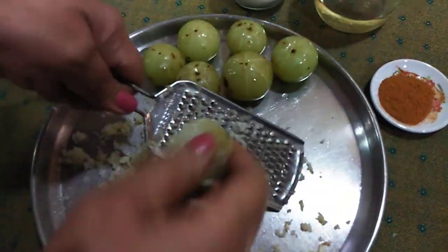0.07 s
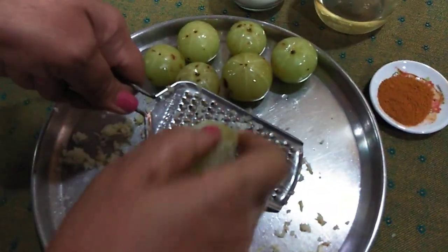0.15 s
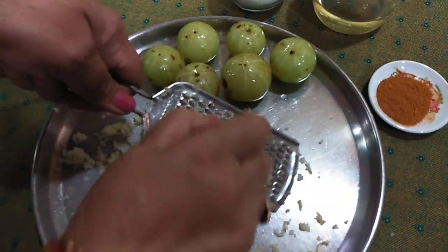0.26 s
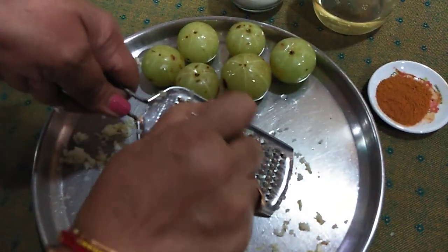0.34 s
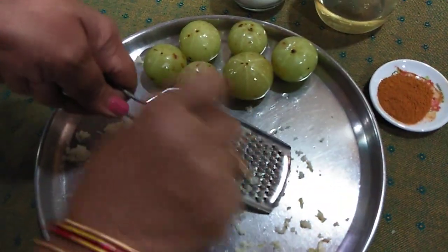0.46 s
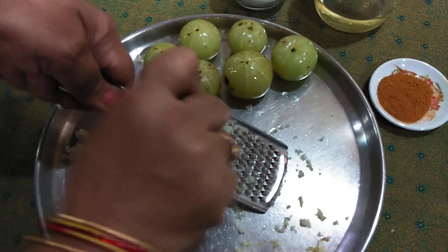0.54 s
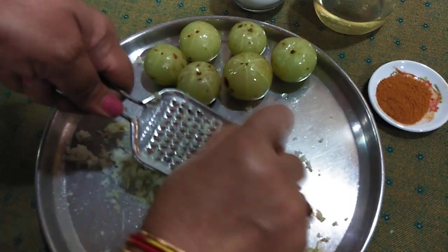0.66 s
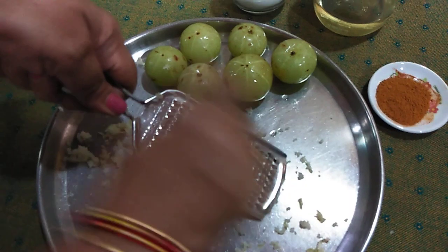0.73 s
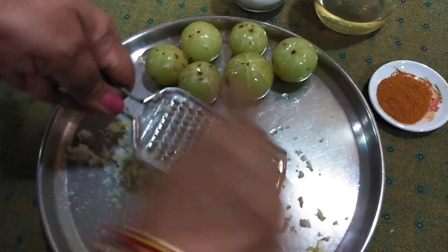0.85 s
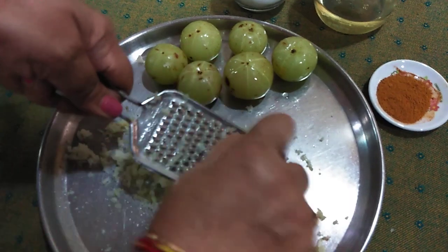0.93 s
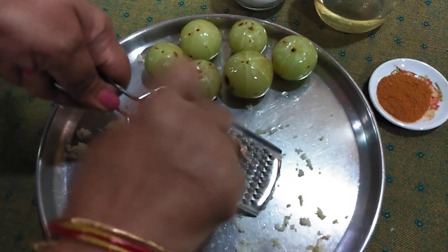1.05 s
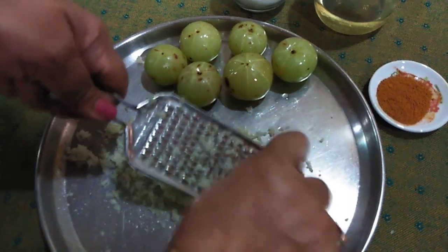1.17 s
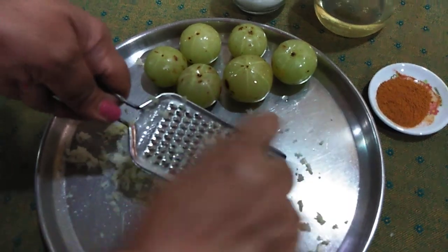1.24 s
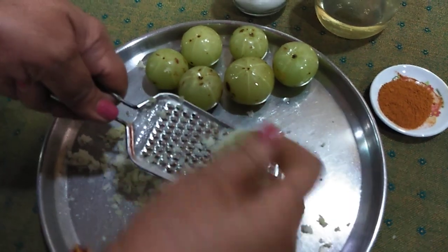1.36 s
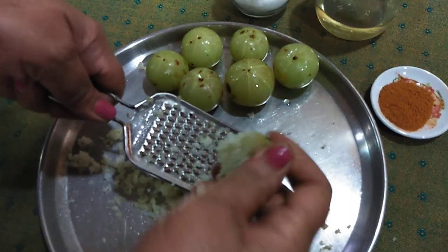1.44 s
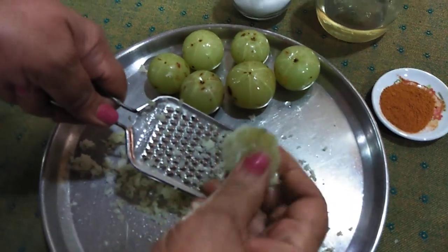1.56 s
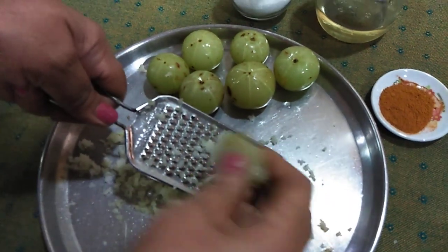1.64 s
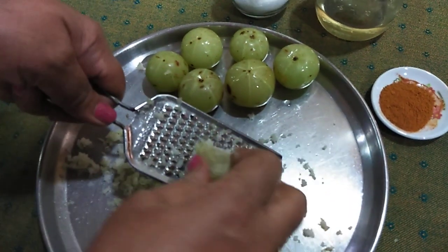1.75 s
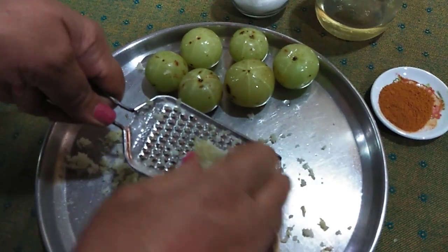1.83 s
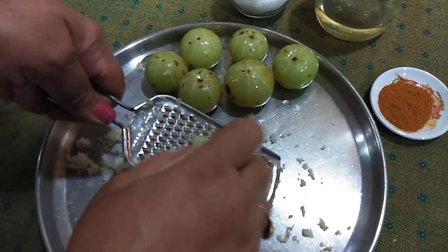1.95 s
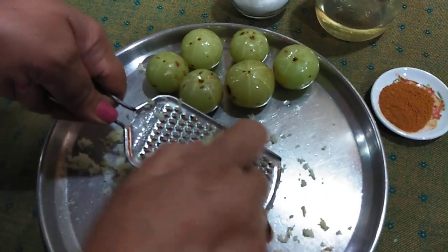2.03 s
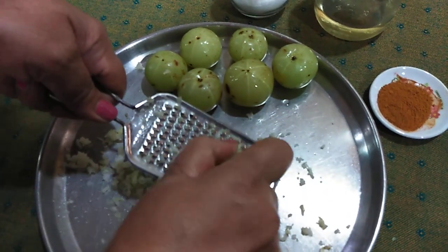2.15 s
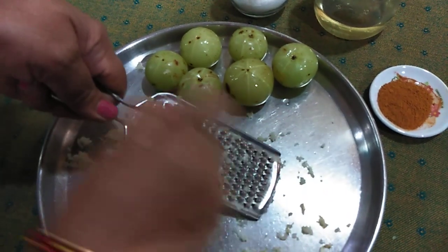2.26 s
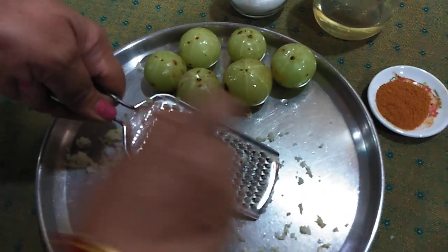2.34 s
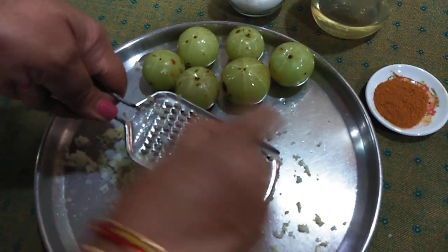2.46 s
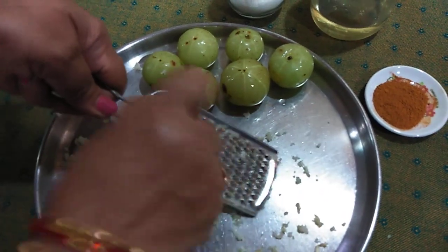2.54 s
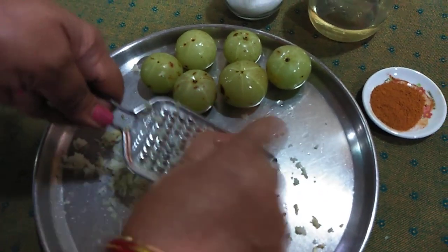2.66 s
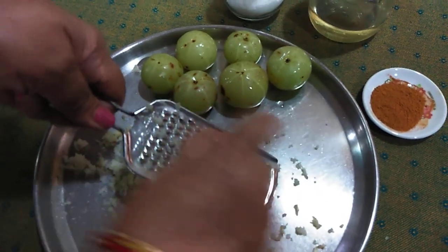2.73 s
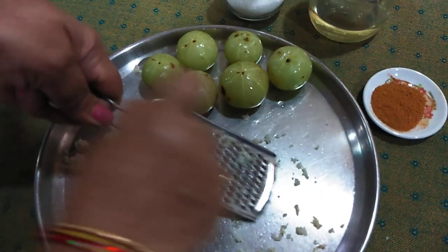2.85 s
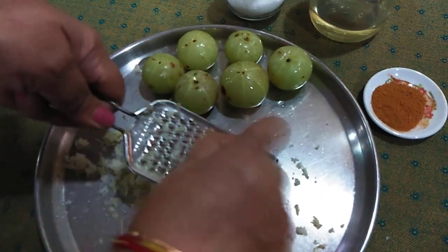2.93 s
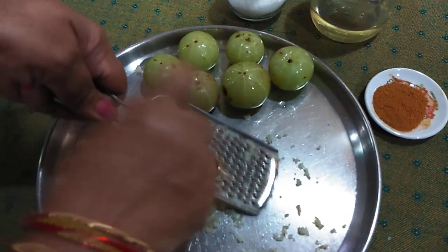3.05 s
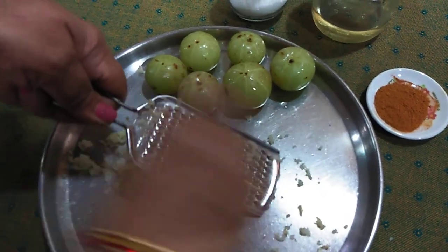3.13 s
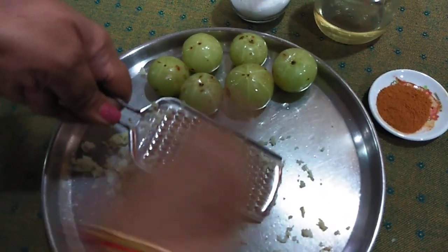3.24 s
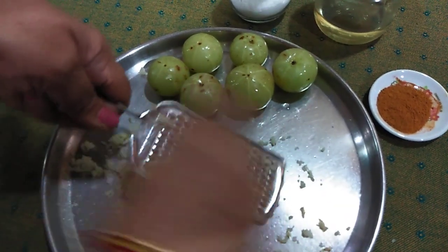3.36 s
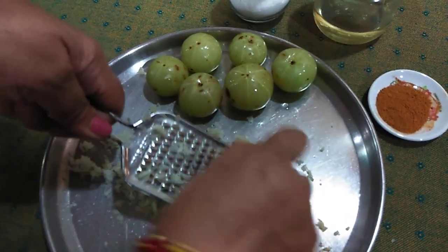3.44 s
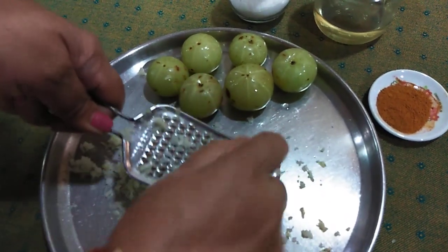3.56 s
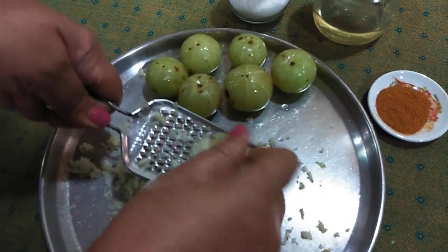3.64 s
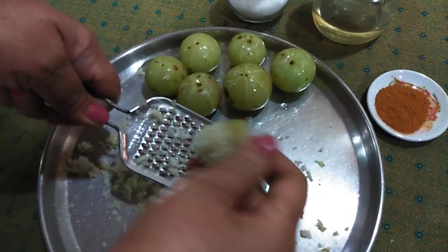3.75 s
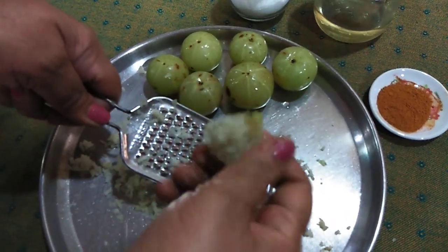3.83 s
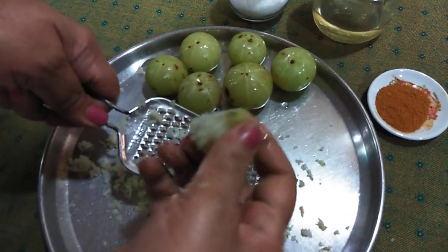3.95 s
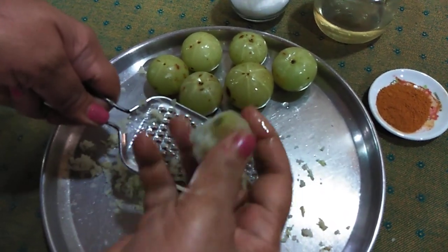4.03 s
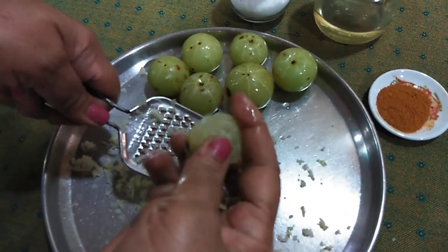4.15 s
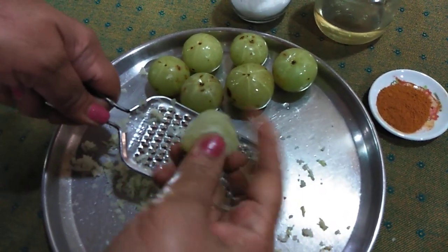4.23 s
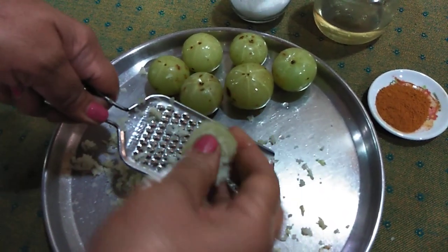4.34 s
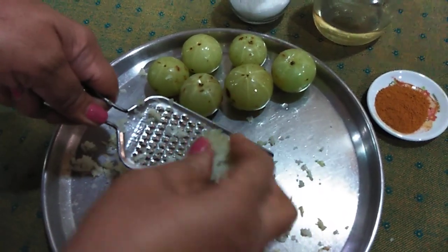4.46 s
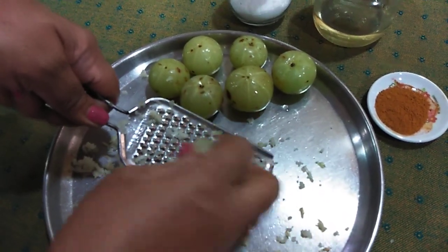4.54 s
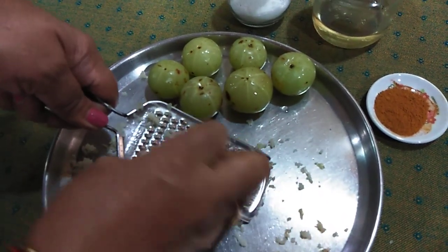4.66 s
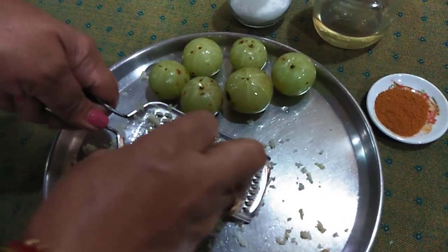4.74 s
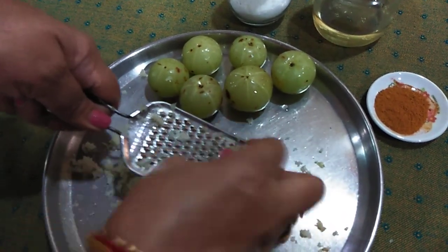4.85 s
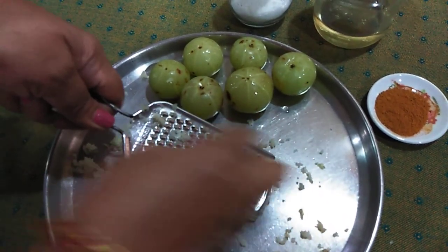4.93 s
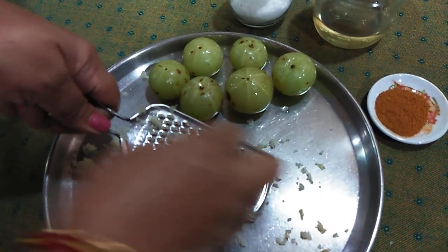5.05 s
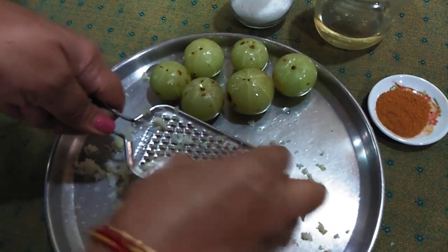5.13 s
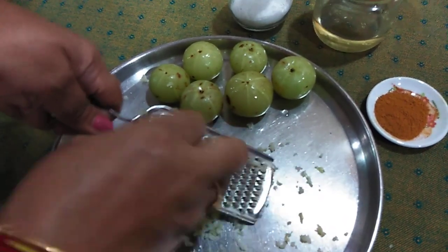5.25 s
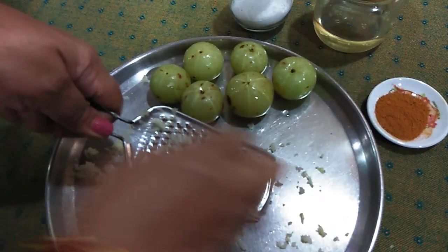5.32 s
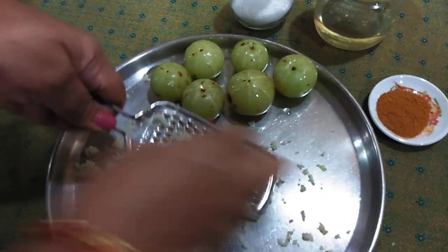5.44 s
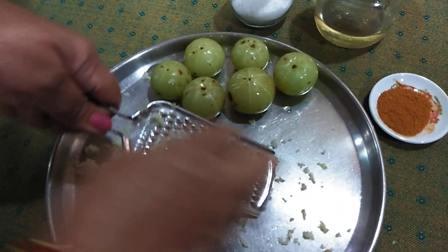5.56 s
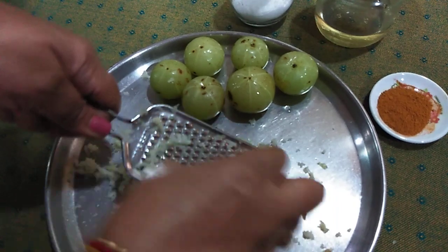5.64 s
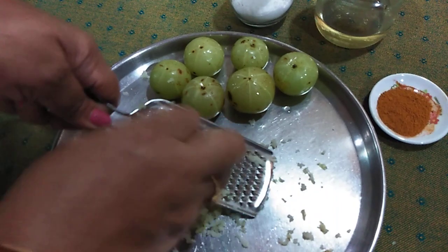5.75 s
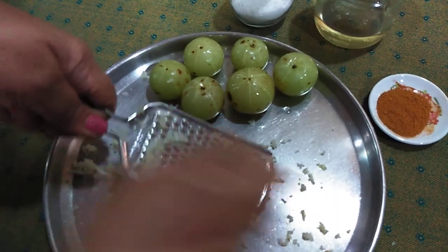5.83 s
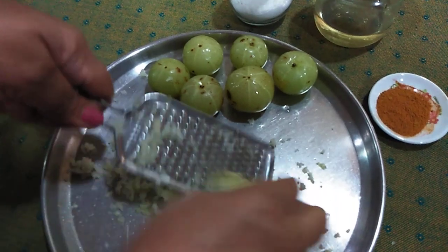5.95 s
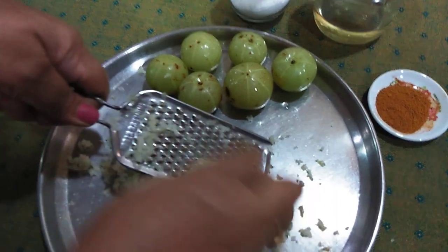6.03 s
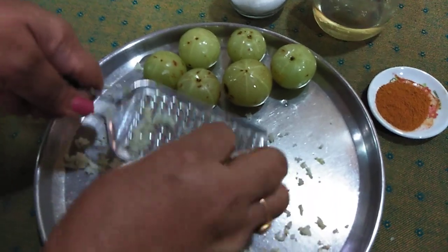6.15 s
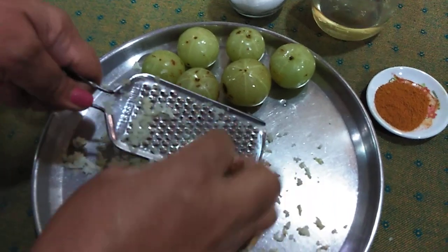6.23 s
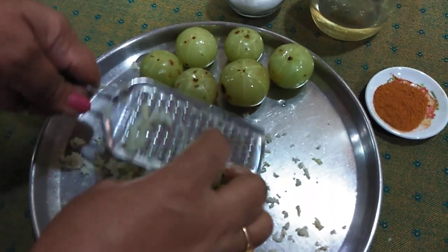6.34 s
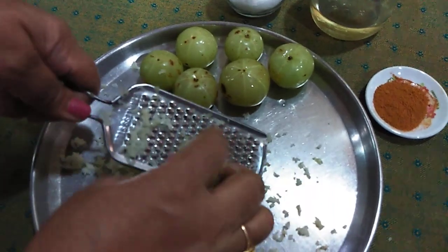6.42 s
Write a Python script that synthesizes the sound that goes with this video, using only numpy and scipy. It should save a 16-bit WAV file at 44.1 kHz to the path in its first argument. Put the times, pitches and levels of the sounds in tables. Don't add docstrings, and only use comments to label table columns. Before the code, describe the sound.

A clipped scrape, some light handling and bangle ticks, then harsh wet rasps of hard fruit on metal teeth. After a quiet gap with jingling bangles a second, longer run follows. Another pause brings shifting steel rumble and a faint high horn outside, before a last bout with brighter bangle clinks and boomy tray. Near microphones, grater slightly to the right, short indoor echo.

```python
import sys
import numpy as np
from scipy import signal
from scipy.fft import rfft, irfft, next_fast_len
from scipy.io import wavfile

SR = 44100
rng = np.random.default_rng(int(sys.argv[2]) if len(sys.argv) > 2 else 0)


def wav_out(sig):
    wavfile.write(sys.argv[1], SR, np.round(np.clip(np.atleast_2d(sig).T, -1, 1) * 32767).astype(np.int16))


def boost(x):
    u = np.asarray(x, float) / 20
    return 10 ** u


N = 286209
TIME = np.arange(N) / SR
SIZE = next_fast_len(N + SR)
HZ = np.maximum(np.fft.rfftfreq(SIZE, 1 / SR), 1)
CUTOFF_HZ = 15520
EDGE = np.sin(np.pi / 2 * np.clip((CUTOFF_HZ - HZ) / 90, 0, 1)) ** 2

# frequency in Hz, level in dB per Hz.
ROOM_TONE = [(18, -70), (30, -33.5), (209, -5), (279, -20), (326, -7.5), (382, -16), (795, -14),
             (1060, -19.5), (1990, -20), (3030, -21.5), (4490, -25), (6150, -34.5), (15800, -30)]
ROOM_TONE_DB = -70.5
# frequency in Hz, correlation.
LIKE_NEAR = [(60, 0.8), (130, 1), (290, 0.9), (640, 0.85), (1410, 0.91), (3100, 0.093), (6800, -0.052)]
LIKE_FAR = [(60, .54), (130, 0.92), (290, 0.63), (640, 0.069), (1410, .0)]

# time of most force in seconds, rise in seconds,
# fall in seconds, tearing in dB, lean on the plate in dB. The next two tables have the same columns.
PUSHES = [(0.011, 0.0086, 0.01, -32.5, -10), (0.733, 0.037, 0.038, -31, -0.5),
          (0.963, 0.034, 0.048, -27.5, 1.5), (1.216, 0.042, 0.04, -28, 0), (2.495, 0.05, 0.042, -32, -2),
          (2.758, 0.054, 0.028, -30, -4.5), (3.003, 0.057, 0.025, -28, 0.2),
          (3.245, 0.058, 0.039, -28, -1.5), (3.457, 0.039, 0.053, -29, -2.5),
          (4.912, 0.049, 0.032, -37, 2.5), (5.19, 0.071, 0.023, -34, 3.5),
          (5.423, 0.041, 0.048, -30.5, -2.5), (5.686, 0.048, 0.051, -33.5, -2),
          (5.951, 0.035, 0.031, -31.5, 2)]
PULLS = [(0.851, 0.056, 0.051, -36, -0.8), (1.099, 0.058, 0.046, -39.5, 3.5),
         (2.355, 0.026, 0.051, -45, -3), (2.609, 0.037, 0.051, -38.5, -3.5), (2.859, 0.05, 0.04, -35, -3.6),
         (3.103, 0.048, 0.044, -38.5, 0.9), (3.345, 0.041, 0.05, -34, -0.5),
         (5.006, 0.016, 0.056, -40.5, 2.5), (5.305, 0.057, 0.032, -38.5, 0), (5.566, 0.05, 0.035, -41.5, 2),
         (5.829, 0.043, 0.038, -40.5, -2)]
TOUCHES = [
    (0.559, 0.015, 0.025, -58, -26),
    (0.602, 0.0092, 0.0052, -57, -13),
    (6.055, 0.02, 0.018, -50.5, -33),
    (6.27, 0.073, 0.049, -76.5, 7.5),
    (6.416, 0.036, 0.037, -72, 3.5),
]
# tearing in dB, plate in dB, tray in dB.
PUSH_DB, PULL_DB, TOUCH_DB = (-0.5, -1.5, -7), (0, 2.5, -5.5), (-3, 9.5, -6.5)
# start in seconds, tearing in dB, plate in dB, tray in dB.
GRIPS = [
    (0, 0, -23, -3.5),
    (0.3, 0, -1, -1),
    (2, 0, 0.5, -0.55),
    (4, 1.5, -4, 2.5),
]
# time in seconds, half length in seconds, rumble in dB, rustle in dB.
MOVES = [(0.069, 0.033, -59, -59), (0.156, 0.018, -65, -72), (0.223, 0.025, -63, -64.5),
         (0.328, 0.031, -58.5, -81), (0.42, 0.064, -60, -57.5), (0.557, 0.027, -54, -48),
         (0.6, 0.011, -61, -49), (0.67, 0.042, -73, -54), (1.304, 0.04, -61, -52),
         (1.46, 0.093, -67, -66.5), (1.638, 0.066, -65, -68.5), (1.76, 0.03, -67, -74),
         (1.859, 0.062, -60, -65.5), (2.041, 0.022, -64.5, -70.5), (2.297, 0.16, -69, -62.5),
         (3.56, 0.073, -58, -65), (3.859, 0.04, -78, -84.5), (3.982, 0.019, -64.5, -72.5),
         (4.08, 0.048, -62, -67), (4.206, 0.049, -59.5, -68.5), (4.424, 0.027, -69.5, -86),
         (4.541, 0.034, -56, -75.5), (4.598, 0.054, -49, -75), (4.648, 0.04, -49.5, -68),
         (4.719, 0.096, -54.5, -55), (4.844, 0.0073, -61.5, -40), (6.063, 0.038, -53, -50.5),
         (6.268, 0.058, -61.5, -61), (6.372, 0.0544, -62, -67), (6.428, 0.033, -66.5, -59.5)]

# time in seconds, plate peak in dB.
BITES = [(0.547, -41), (0.009, -26.5), (0.221, -61), (1.639, -52), (0.694, -21), (0.933, -42), (1.774, -59),
         (1.181, -27), (2.453, -20), (2.715, -42), (3.015, -31), (3.199, -23), (4.838, -39), (5.005, -42),
         (5.142, -38), (5.39, -40), (5.515, -43.5), (5.668, -20), (5.798, -33), (6.236, -50),
         (5.922, -46.5), (5.939, -30)]
# time in seconds, plate peak in dB, pitch of the contact point in Hz.
CATCHES = [(0.0093, -20.5, 710), (0.546, -35.5, 818), (0.602, -35, 764), (0.694, -26, 854),
           (0.724, -45, 930), (0.812, -33, 826), (0.846, -37, 776), (0.869, -25, 770), (0.937, -38, 970),
           (0.96, -16, 810), (1.064, -30, 720), (1.091, -26, 806), (1.181, -24.5, 774), (1.204, -24, 790),
           (1.228, -14.5, 759), (2.342, -28.5, 880), (2.374, -35, 740), (2.441, -35, 880),
           (2.454, -27.5, 751), (2.493, -23, 840), (2.588, -30, 1084), (2.711, -33, 890), (2.717, -24, 924),
           (2.831, -33, 815), (2.857, -22.5, 953), (2.928, -40, 770), (2.957, -35, 860),
           (2.979, -16.5, 744), (3.016, -23, 784), (3.119, -32, 750), (3.178, -33, 900), (3.199, -22, 814),
           (3.219, -20.5, 720), (3.245, -19, 770), (3.265, -21.5, 762), (3.312, -32, 800),
           (3.339, -22, 950), (3.43, -33, 781), (3.455, -16.5, 710), (3.485, -27, 836), (4.838, -49, 673),
           (4.86, -51, 706), (4.879, -32.5, 820), (5.004, -44, 786), (5.032, -29, 750), (5.118, -30, 900),
           (5.127, -29, 920), (5.141, -21.5, 920), (5.182, -26, 820), (5.265, -48, 790),
           (5.389, -24.5, 798), (5.434, -30, 840), (5.636, -44, 960), (5.667, -29, 835), (5.685, -28, 970),
           (5.701, -21.5, 798), (5.825, -37, 820), (5.917, -37, 920), (5.94, -23.5, 833),
           (6.425, -38.5, 792)]
BITE_CRACK_DB, CATCH_CRACK_DB = -3, -18
# frequency in Hz, left in dB per Hz, right in dB per Hz.
TEARING = [(294, -9.5, -14), (570, -0.5, 1), (1174, -11.5, -6), (1890, -6.5, -9), (2610, -13, -7),
           (3580, -8, -9.5), (4170, -3.5, -3.5), (5100, -14.5, -2), (6300, -4, -10), (7380, -11, -24.5),
           (10000, -16.5, -19.5), (10660, -9, -18.5), (13200, -10, -11), (14810, 1.5, -8.5)]

# frequency in Hz, width in Hz, level in dB.
PLATE = [(640, 28, -3), (755.5, 54, 2), (814, 38.3, 3.5), (836, 44, -1), (933.5, 40, -5), (836, 250, -8),
         (1009, 130, -2.5), (1337, 47, -11.5), (1561, 94, -6), (1893, 44, -5.5), (2257, 65, -10.5)]
FOCUS_DB, FAR_MODE_DB = 39.5, 3.5
# frequency in Hz, width in Hz, level in dB.
TRAY = [(73.4, 7.7, -14.5), (120, 11, 0), (188, 16.5, 0), (216, 10.6, 1), (258, 32, -6), (335.4, 31, -8.5),
        (437, 44, -16)]
# time in seconds, peak in dB, frequency in Hz.
FREE_RING = [
    (0.0095, -37, 664),
    (0.0095, -39, 766),
    (0.0095, -54, 1390),
    (0.0095, -51, 1992),
    (0.0095, -50, 4000),
    (0.0095, -48, 5378),
]
# time in seconds, peak in dB, frequency in Hz.
BARKS = [(0.6948, -28, 1890), (0.754, -27.5, 1870), (0.9333, -34, 1490), (0.9542, -26.5, 1620),
         (1.052, -33, 1400), (1.092, -30.5, 1580), (1.1922, -23, 1460), (1.2144, -24, 1873),
         (1.2346, -26, 1324), (2.3431, -32, 1570), (2.49, -26, 1900), (2.5875, -29.5, 1600),
         (2.7122, -29.5, 1430), (2.9547, -27, 1310), (3.1914, -27.5, 1900), (3.3034, -30, 1780),
         (3.455, -22.5, 1405), (5.0025, -31, 1574), (5.3906, -31, 1560), (5.435, -35, 1430),
         (5.9199, -41, 1220), (5.9509, -29, 1570)]
# time in seconds, peak in dB, frequency in Hz.
FOOT_KNOCKS = [(0.958, -44.5, 333), (1.186, -43, 440), (1.223, -39, 385), (2.748, -40, 330),
               (2.957, -44, 417), (3.245, -37, 272), (3.457, -36, 342), (4.6, -51, 200),
               (4.639, -48.5, 388), (5.179, -39, 423), (5.427, -34, 272), (5.685, -42, 352),
               (5.94, -35.5, 433), (5.935, -32, 241), (5.97, -33, 191), (6.07, -53, 342)]
LEFT_LAG = 4

# time in seconds, half length in seconds, sizzle in dB, ring over sizzle in dB.
CLINKS = [(0.224, 0.024, -56, -20), (0.452, 0.021, -42, -36), (0.493, 0.033, -50, -14),
          (1.344, 0.012, -45, -18), (1.457, 0.024, -69, -3), (1.536, 0.018, -45, -16),
          (1.608, 0.019, -58.5, -17), (1.645, 0.027, -57.5, -25), (1.704, 0.02, -42, -24.5),
          (1.777, 0.022, -38.5, -23.5), (1.813, 0.028, -40.5, -22.5), (3.99, 0.027, -70, -11.5),
          (4.05, 0.022, -51, -24.5), (4.201, 0.019, -60, -27), (4.992, 0.03, -32.5, -8),
          (5.35, 0.025, -28.5, -17.5), (5.522, 0.029, -26, -25), (5.573, 0.049, -33, -28),
          (5.859, 0.028, -31, -30), (6.008, 0.017, -34, -16), (6.049, 0.024, -27.5, -19),
          (6.198, 0.017, -63.5, -8), (6.293, 0.011, -60, -4), (6.376, 0.017, -39.5, -28),
          (6.404, 0.02, -52, -10.5)]
# time in seconds, peak of second mode in dB, frequency in Hz.
PINGS = [(0.4967, -57, 4640), (1.5352, -57, 4450), (1.5454, -64, 4410), (1.705, -61.5, 4390),
         (1.7743, -59, 4440), (1.814, -58, 4860), (1.8257, -60.5, 4630), (4.0525, -64.5, 4630),
         (5.5126, -39, 4760), (6.043, -28.5, 4440), (6.0552, -38, 4400), (6.066, -38, 4320),
         (6.4144, -55, 4170)]
RING_RATIOS = np.array([1 / 2.83, 1, 5.42 / 2.83, 8.77 / 2.83])
BANGLE_HZ, BANGLE_SPREAD, THIRD_MODE_DB = 4620, 0.025, -11
# frequency in Hz, left in dB, right in dB.
SIZZLE = [(3040, -22.5, -22.0), (9000, -25.5, -28.0), (11950, -18.5, -29.5), (13930, -7.0, -4.5),
          (16100, -3.0, -16.0)]

# time in seconds, peak in dB, frequency in Hz.
SNAPS = [(0.5978, -28.5, 4650), (0.6909, -26, 5430), (0.7009, -21, 4480), (0.7215, -17, 5340),
         (0.7996, -31, 3720), (0.819, -21.5, 3950), (0.841, -21, 4400), (0.927, -35, 3960),
         (0.9362, -22, 6000), (0.9594, -13.5, 4200), (0.9872, -22, 4980), (1.1713, -27, 6350),
         (1.1853, -22, 4120), (1.2384, -12, 4035), (2.4444, -34, 6580), (2.4539, -27, 6620),
         (2.4738, -29, 4260), (2.7118, -39, 4500), (2.7293, -38, 4120), (2.7427, -35, 4170),
         (2.8191, -33, 4130), (2.8595, -31, 4140), (2.9403, -39, 4630), (2.9587, -32, 4020),
         (2.9822, -24, 4600), (3.0136, -14, 5100), (3.1753, -28, 5870), (3.1947, -30, 4400),
         (3.2127, -23, 4600), (3.2491, -15.5, 5020), (3.3109, -35, 5890), (3.3334, -25, 4670),
         (3.4117, -34, 4670), (3.4316, -28, 4600), (3.445, -22, 5970), (4.8834, -32.5, 3850),
         (4.914, -22, 3900), (4.9891, -24, 4420), (5.0026, -24, 4180), (5.12, -30, 6100),
         (5.1473, -23, 5740), (5.1812, -22, 4170), (5.2595, -33, 4900), (5.2874, -38, 4200),
         (5.3882, -37, 5130), (5.4115, -19, 6150), (5.5116, -27.5, 4760), (5.5643, -36, 4350),
         (5.6377, -39, 4280), (5.6496, -33, 4600), (5.666, -26, 3880), (5.684, -24, 4260), (5.8, -40, 4080),
         (5.917, -30, 5480), (5.936, -24, 4550)]
# time in seconds, peak in dB, frequency in Hz.
BOOMS = [(0.709, -32.5, 205), (0.949, -30.5, 220), (1.01, -32.5, 203), (1.066, -32.5, 208),
         (1.189, -26.5, 212.3), (1.222, -25, 201.7), (2.305, -41, 211.3), (2.335, -31, 209.7),
         (2.459, -30.5, 200), (2.525, -44, 223), (2.605, -35, 203), (2.637, -30.5, 205.7),
         (2.702, -37.5, 240), (2.833, -36, 203), (2.997, -48, 188), (3.111, -33.5, 230),
         (3.226, -27.5, 180.6), (3.365, -34.5, 211), (3.453, -20, 194), (4.555, -45.5, 168.4),
         (4.85, -48, 197), (4.879, -33.5, 198), (5.151, -26.5, 199), (5.31, -44, 188), (5.406, -30.5, 202),
         (5.443, -21.5, 208.6), (5.558, -37, 216), (5.687, -22, 208), (5.836, -46, 190), (5.74, -35.5, 209),
         (0.83, -40.5, 124), (1.03, -43, 122), (5.751, -40, 120), (2.309, -50.5, 110), (6.075, -53, 191)]
BOOM_T60_S, DAMPING_PER_DB = 0.25, 0.025
# time in seconds, peak in dB.
THUDS = [(0.708, -44), (0.949, -35), (1.011, -36), (1.067, -38), (1.191, -54), (1.82, -56), (2.461, -46),
         (2.702, -50), (2.833, -46.5), (2.998, -36.5), (3.365, -42), (3.453, -27.5), (4.555, -46.5),
         (4.628, -47), (4.878, -43.5), (5.152, -41), (5.31, -41), (5.406, -40.5), (5.686, -46),
         (5.926, -48), (5.957, -32.5)]
# frequency in Hz, start in seconds, end in seconds, level in dB.
HORN = [
    (2895, 4.03, 4.35, -74),
    (2830, 3.97, 4.33, -74),
    (2810, 4.34, 4.5, -79),
    (2510, 4.07, 4.13, -73),
    (2470, 4.14, 4.21, -78),
    (3120, 4.32, 4.55, -87),
    (2825, 4.5, 4.75, -85),
]


def rms_one(x):
    return x / np.sqrt(np.mean(x ** 2) + 1e-20)


def over_hz(points, column=1):
    points = np.array(points)
    return np.interp(np.log(HZ), np.log(points[:, 0]), points[:, column])


def wander(per_s):
    knots = rng.standard_normal(400)
    return np.interp(TIME * per_s, np.arange(len(knots)), knots)


def flicker(spread_db, per_s):
    knots = rng.standard_normal(400)
    gain_db = spread_db * np.interp(TIME[::64] * per_s, np.arange(len(knots)), knots)
    return np.repeat(boost(gain_db), 64)[:N]


def grains(per_s, spread_db):
    sizes = boost(spread_db * np.minimum(rng.exponential(1, N), 3.5)) * rng.choice([-1, 1], N)
    return rms_one(sizes * (rng.random(N) < per_s / SR))


def impulses(rows, db):
    out = np.zeros(N)
    s, peak_db = np.transpose(rows)[:2]
    out[(s * SR).astype(int)] = boost(peak_db + db)
    return out


def knocks(rows, rise_s, decay_s, db):
    out, after = np.zeros(N + 4000), np.arange(4000) / SR
    envelope = (1 - np.exp(-after / rise_s)) * np.exp(-after / decay_s)
    for s, peak_db, hz in rows:
        start = int(s * SR)
        out[start:start + len(after)] += boost(peak_db + db) * np.sin(2 * np.pi * hz * after) * envelope
    return out[:N]


def hump(s, rise, fall, blunt):
    out = np.zeros(N)
    near = slice(max(int((s - 6 * rise) * SR), 0), max(int((s + 6 * fall) * SR), 0))
    t = TIME[near]
    out[near] = boost(-10 * np.where(t < s, (s - t) / rise, (t - s) / fall) ** blunt)
    return out


def force(column, lag, blunt):
    power = np.zeros(N)
    for rows, share_db in [(PUSHES, PUSH_DB), (PULLS, PULL_DB), (TOUCHES, TOUCH_DB)]:
        for s, rise, fall, db, lean_db in rows:
            grip_db = [g[1:] for g in GRIPS if g[0] <= s][-1]
            db = db + share_db[column] + grip_db[column] + lean_db * (column == 1)
            power += (hump(s + lag, rise, fall, blunt) * boost(db)) ** 2
    return np.sqrt(power)


def pauses(column):
    power = sum((hump(m[0], m[1] * 0.82, m[1] * 1.15, blunt=0.92) * boost(m[column + 1])) ** 2 for m in MOVES)
    return np.sqrt(power)


def resonate(x, hz, width_hz):
    r = np.exp(-np.pi * width_hz / SR)
    zeros = [(1 - r * r) / 2, 0, (r * r - 1) / 2]
    poles = [1, -2 * r * np.cos(2 * np.pi * hz / SR), r * r]
    return signal.lfilter(zeros, poles, x + 1e-18)


def favour(hz):
    s, _, contact_hz = np.transpose(CATCHES)
    octaves = np.abs(np.log2(hz / np.interp(TIME[::64], s, contact_hz)))
    return np.repeat(boost(3.5 - np.minimum(FOCUS_DB * octaves, FAR_MODE_DB)), 64)[:N]


def body(push, modes, shift_db=0., focus=False):
    scale = np.sqrt(sum(boost(2 * db) * np.pi * width / SR for hz, width, db in modes))
    out = np.zeros(N)
    for k, (hz, width, db) in enumerate(modes):
        gain = boost(db) * flicker(shift_db, 14.)
        if focus and hz < 1150:
            gain = gain * favour(hz)
        out += (-1) ** k * resonate(gain * push, hz, width)
    return out / scale


def pair(mid, side, likeness, left_db=0, right_db=0):
    alike = np.clip(over_hz(likeness), -1, 1)
    shared = np.sqrt(1 + alike) * rfft(mid, SIZE)
    own = np.sqrt(1 - alike) * rfft(side, SIZE)
    colour = boost(np.array([left_db + 0 * HZ, right_db + 0 * HZ])) * np.sqrt(EDGE)
    colour = colour / np.sqrt(2 * np.mean(colour ** 2))
    return irfft(colour * [shared + own, shared - own], SIZE)[:, :N]


def room_tone():
    mid, side = rng.standard_normal((2, N))
    tone_db = over_hz(ROOM_TONE)
    return boost(ROOM_TONE_DB + 1.0) * pair(mid, side, LIKE_FAR, tone_db + .3, tone_db - .3)


def tearing():
    bursts = signal.lfilter([.05], [1, -.95], np.abs(grains(800., spread_db=3.)))
    bursts = rms_one(.5 + bursts * 1.1)
    scuffs = signal.lfilter([.02], [1, -.98], np.abs(grains(380.0, spread_db=2.5)))
    scuffs = rms_one(0.25 + scuffs * 1.7)
    cracks = impulses(BITES, db=BITE_CRACK_DB - 11.5) + impulses(CATCHES, db=CATCH_CRACK_DB - 14.5)
    level = force(column=0, lag=.0, blunt=2.61) * bursts + boost(-3.5) * pauses(column=2) * scuffs
    level += signal.lfilter([1], [1, -.99], cracks)
    hiss = level * rng.standard_normal((3, 2, N))
    high_modes = np.geomspace(1100, 17000, 46) * boost(rng.normal(0, 0.12, 46))
    torn = 0.32 * hiss[2]
    for k, hz in enumerate(high_modes):
        torn = torn + resonate(flicker(spread_db=5.0, per_s=35.) * hiss[k % 2], hz, hz * 0.038)
    return boost(2) * pair(*torn, LIKE_NEAR, over_hz(TEARING, column=1), over_hz(TEARING, column=2))


def plate(digs):
    buzz = force(column=1, lag=-0.00038, blunt=2.8) * boost(-1.5) + boost(-6) * pauses(column=2)
    return body(buzz * grains(900.0, spread_db=4.3) + digs, PLATE, shift_db=3.5, focus=True)


def tray():
    boom = force(column=2, lag=-0.0018, blunt=1.29) * boost(-2.5)
    return body(boom * grains(700., spread_db=2.5), TRAY, shift_db=1.5)


def sliding():
    band = signal.butter(3, [65., 400.], "band", fs=SR, output="sos")
    slips = pauses(column=1) * flicker(spread_db=3.0, per_s=39.0) * grains(3200.0, spread_db=3.0)
    return boost(14.0) * signal.sosfilt(band, slips)


def steel():
    mid = plate(impulses(CATCHES, db=12.5)) + tray() + sliding()
    side = plate(0) + tray() + sliding()
    mid += knocks(CATCHES, rise_s=0.001, decay_s=0.0046, db=-0.5)
    mid += knocks(FREE_RING, rise_s=0.0012, decay_s=0.038, db=-5.0)
    mid += knocks(BARKS, rise_s=.002, decay_s=0.0083, db=-3.0)
    mid += knocks(FOOT_KNOCKS, rise_s=.004, decay_s=.016, db=1.5)
    return pair(mid + booms(), side, LIKE_NEAR, -0.86, 0.59)


def bangles():
    rings, sizzle = np.zeros(N), np.zeros(N)
    ticks = grains(3600.0, spread_db=8.0)
    for (s, half, sizzle_db, ring_db), size in zip(CLINKS, rng.standard_normal(len(CLINKS))):
        near = slice(max(int((s - .06) * SR), 0), int((s + .12) * SR))
        touch = hump(s, half * 0.49, half * 0.72, blunt=2.1)
        sizzle += boost(sizzle_db) * touch
        modes_hz = BANGLE_HZ * (1 + BANGLE_SPREAD * size) * RING_RATIOS
        for mode_hz, db in zip(modes_hz, [-8, 0, THIRD_MODE_DB, 4]):
            gain = boost(sizzle_db + ring_db + db + 16.5)
            rings[near] += gain * resonate((ticks * touch)[near], mode_hz, 167.0)
    hiss = sizzle * rng.standard_normal((2, N))
    bright = 0.41 * hiss
    for hz in np.linspace(8400, 15400, 18):
        bright = bright + resonate(flicker(spread_db=4.0, per_s=32.0) * hiss, hz, 163.0)
    bright = pair(*bright, LIKE_FAR, over_hz(SIZZLE, column=1), over_hz(SIZZLE, column=2))
    return rings * boost([[1.5], [-1.5]]) + boost(-3.0) * bright


def pings():
    out = np.zeros(N)
    for ratio, mode_db in zip(RING_RATIOS, [-7., -2., -10.]):
        rows = [(s, db, hz * ratio) for s, db, hz in PINGS]
        out += knocks(rows, rise_s=0.0011, decay_s=.006, db=mode_db)
    return out


def snaps():
    ping = knocks(SNAPS, rise_s=0.0018, decay_s=.006, db=-4.5)
    rough = signal.lfilter([1], [1, -1.9, .9025], rng.standard_normal((2, N)))
    return boost([[-0.6], [0.6]]) * rms_one(rough) * ping


def booms():
    out, after = np.zeros(N + SR // 2), np.arange(SR // 2) / SR
    for s, db, hz in BOOMS:
        t60 = np.clip(BOOM_T60_S * (1 - DAMPING_PER_DB * (db + 30.0)), .05, 1)
        ring = np.sin(2 * np.pi * hz * after) * (1 - np.exp(-after / 0.0032)) * boost(-60 * after / t60)
        out[int(s * SR):int(s * SR) + len(after)] += boost(db - 2.5) * ring
    thud = np.sin(2 * np.pi * 85.0 * after) * np.exp(-after / 0.022)
    return out[:N] + signal.fftconvolve(impulses(THUDS, db=-4.0), thud)[:N]


def horn():
    out = np.zeros((2, N))
    for hz, start, end, db in HORN:
        blown = np.clip(np.minimum(TIME - start, end - TIME) / 0.033, 0, 1) * boost(-8 * (TIME - start))
        fading = boost(db + 0.8 + 5.5 * np.array([wander(35.), wander(35.)]))
        out += fading * blown * np.sin(2 * np.pi * hz * TIME + .6 * wander(50.))
    return out


def kitchen(x, t60, dull_hz):
    s = np.arange(SR // 2) / SR
    noise = rng.standard_normal((2, len(s))) * (s > .006)
    lows = signal.lfilter(*signal.butter(1, dull_hz, fs=SR), noise)
    tail = lows * boost(-60 * s / t60) + (noise - lows) * boost(-60 * s / (t60 * 0.72))
    tail = tail / np.sqrt(np.sum(tail ** 2) / 2)
    return irfft(rfft(x, SIZE) * rfft(tail, SIZE), SIZE)[:, :N]


def scene():
    near = tearing() + snaps() + steel()
    near = np.array([np.pad(near[0], (LEFT_LAG, 0))[:N], near[1]])
    wrist = bangles() + pings()
    echo = boost(-15.5) * kitchen(near + 0.56 * wrist, t60=0.33, dull_hz=4000)
    return near + wrist + echo + horn() + room_tone()


def roll_off(x):
    return signal.sosfilt(signal.butter(12, 16850, fs=SR, output="sos"), x)


def record(dry):
    skirt = boost(-38.5) * np.clip((CUTOFF_HZ + 350 - HZ) / 200, 0, 1)
    bass_loss = np.sqrt(1 + (28.0 / HZ) ** 4)
    mix = irfft(rfft(dry, SIZE) / bass_loss * np.maximum(EDGE, skirt), SIZE)[:, :N]
    return roll_off(mix)


dry = scene()
out = record(dry)
wav_out(out)
```